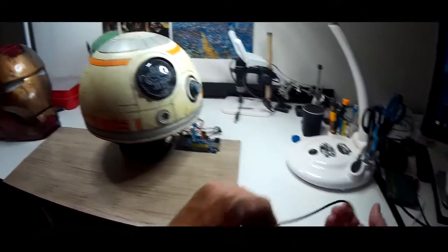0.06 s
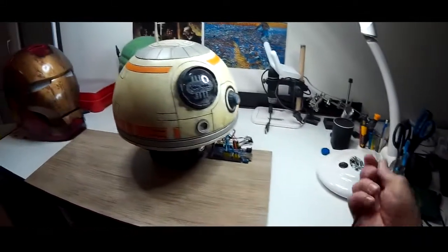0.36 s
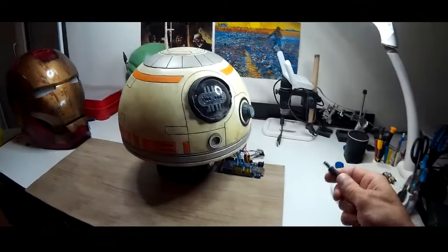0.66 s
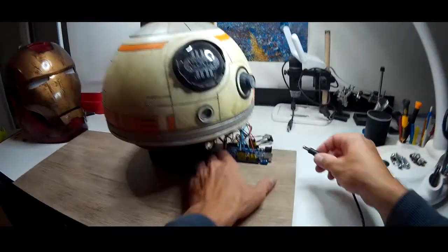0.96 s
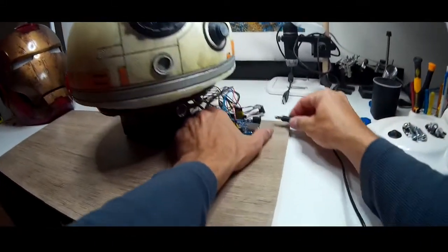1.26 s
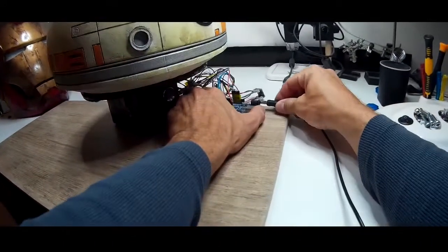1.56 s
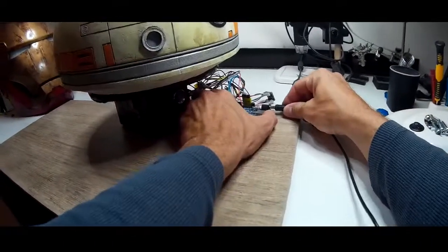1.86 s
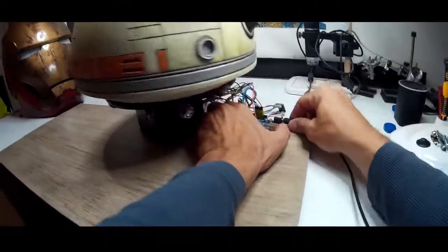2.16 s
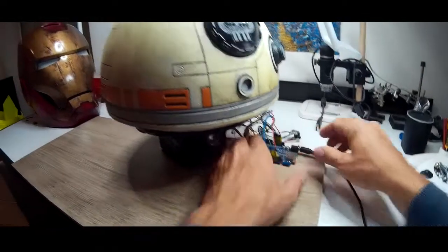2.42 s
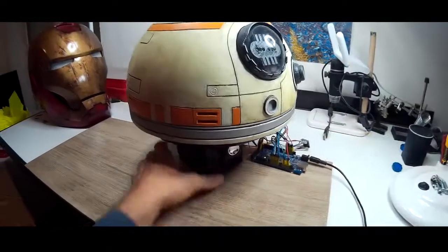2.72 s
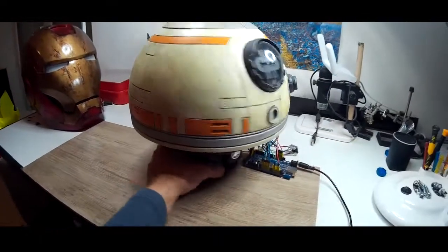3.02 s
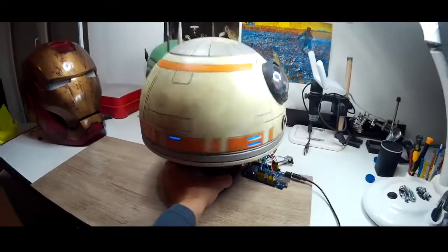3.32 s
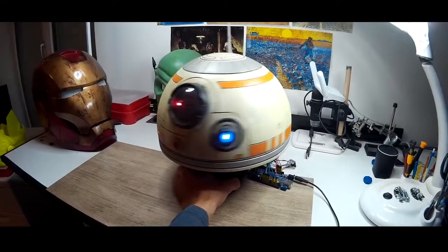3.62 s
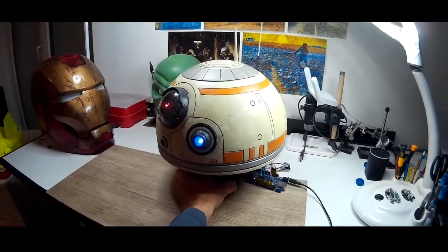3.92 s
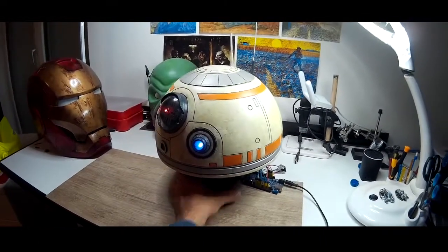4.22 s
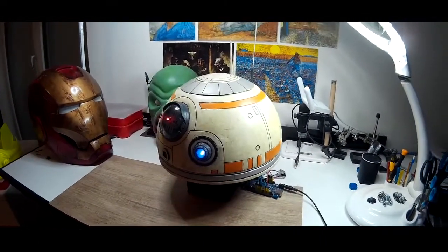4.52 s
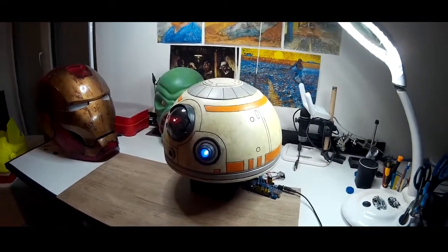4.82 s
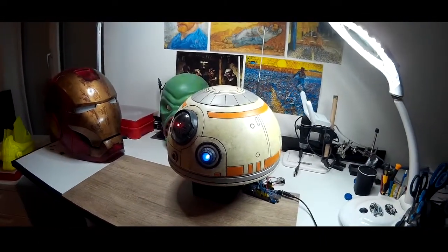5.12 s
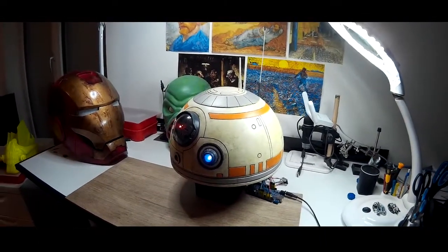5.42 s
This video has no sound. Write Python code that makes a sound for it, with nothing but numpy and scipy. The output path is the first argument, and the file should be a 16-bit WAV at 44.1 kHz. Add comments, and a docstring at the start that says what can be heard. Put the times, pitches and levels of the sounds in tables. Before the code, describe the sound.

At about 0.2 seconds a hex key lands on a wooden board with a sharp knock and three quick bounces. Sleeves brush quietly over the wood, with soft hand bumps near 0.8 seconds and a dry palm slide from 1.1 to 1.5 seconds. At 2 seconds two clicks start a short, gritty scrape with squeaky chirps as a hollow plastic dome jerks round, stopping by 2.4 seconds. Faint cloth sweeps follow. At 3 seconds a nudge brings a softer rub with thin singing tones. After a click at 3.2 seconds the dome swings in a louder, stuttering scrape, its shell ringing. Near 3.4 seconds its drive gives a brief, rough squeal that falls and lifts slightly. The scrape fades with light ticks by 3.9 seconds. Faint brushing and a small tap at 4.8 seconds remain. The microphone is close, in a small room with a faint hum.

```python
"""Hex key and plastic dome on a desk

A hex key drops on a wooden board, and sleeves, palm and fingers brush past as hands reach for a printed
plastic dome. The dome jerks round, is nudged, then swings further: its base scrapes in stick-slip, the
hollow shell rings, its drive squeals. One close microphone, in a small room with a faint hum."""
import sys
import numpy as np
from scipy import signal
from scipy.fft import rfft, irfft
from scipy.io import wavfile
from scipy.ndimage import uniform_filter1d

SR = 44100
rng = np.random.default_rng(int(sys.argv[2]) if len(sys.argv) > 2 else 0)


def pcm_store(signal):
    """Save signal as 16-bit PCM."""
    levels = np.round(np.clip(np.atleast_2d(signal), -1, 1) * 32767)
    wavfile.write(sys.argv[1], SR, levels.astype(np.int16).T)


N = 245904
TIME = np.arange(N) / SR


def amp(db):
    """Decibels to gain."""
    return 10 ** (np.asarray(db) / 20)


def unit(x):
    """Scale to rms 1."""
    return x / np.sqrt(np.mean(x ** 2))


def band(x, low_hz, high_hz, order=3):
    """Butterworth band-pass."""
    edges_hz = [low_hz, min(high_hz, SR / 2 - 500)]
    return signal.sosfilt(signal.butter(order, edges_hz, "band", fs=SR, output="sos"), x)


def convolve(x, response):
    """Pass a sound through an impulse response."""
    return signal.fftconvolve(x, response)[:len(x)]


def colour(x, points, size=4096):
    """Minimum-phase EQ through (freq_hz, gain_db) points."""
    hz, db = np.transpose(points)
    bin_hz = np.arange(size // 2 + 1) * SR / size
    gain_db = np.interp(np.log(bin_hz + 1), np.log(hz), db)
    cepstrum = irfft(np.log(amp(gain_db)))
    cepstrum[1:size // 2] *= 2
    cepstrum[size // 2 + 1:] = 0
    return convolve(x, irfft(np.exp(rfft(cepstrum))))


def wander(rate_hz):
    """Smooth random drift of rms 1."""
    hold = max(int(SR / rate_hz), 1)
    steps = np.repeat(rng.standard_normal(N // hold + 1), hold)
    return unit(uniform_filter1d(steps, hold)[:N])


def slips(per_s, spread_db):
    """Stick-slip: tiny releases at random moments, some larger than the rest."""
    releases = (rng.random(N) < per_s / SR) * rng.choice([-1, 1], N)
    return unit(releases * amp(spread_db * np.clip(rng.standard_normal(N), -2, 2)))


def swell(centre_s, half_s):
    """A bell-shaped envelope: a movement speeds up and slows down again."""
    return np.exp(-((TIME - centre_s) / half_s) ** 2 / 2)


def swells(rows):
    """The summed envelope of (centre_s, level_db, half_length_s) movements."""
    return sum(amp(db) * swell(centre_s, half_s) for centre_s, db, half_s in rows)


def held(start_s, end_s, rise_db_per_s, fall_db_per_s):
    """An envelope that rises, holds at 1 from start to end, then falls."""
    before_s = np.maximum(start_s - TIME, 0)
    after_s = np.maximum(TIME - end_s, 0)
    return amp(-rise_db_per_s * before_s - fall_db_per_s * after_s)


# EQ of the room's air: freq_hz, gain_db
AIR_EQ = [(12, -40.5), (20, -6.5), (85, -6), (219, -8.5), (324, -12), (352, -12), (393, -11), (725, -14),
          (881, -14), (1010, -17), (1500, -17), (1630, -24.5), (15500, -31.5)]


def room_tone():
    """Still air, a wavering electric hum that swells as the hands near, and a thin electronic whistle."""
    air = unit(colour(rng.standard_normal(N), AIR_EQ)) * amp(-62.63 + .31 * wander(4.9))
    hands_near = held(1.13, 1.5, rise_db_per_s=115, fall_db_per_s=7.5)
    hum_gain = (amp(-74) + amp(-61) * hands_near) * amp(wander(9.7))
    hum_hz = 322 + 1.4 * wander(11)
    hum = hum_gain * np.sin(2 * np.pi * np.cumsum(hum_hz) / SR)
    whistle = amp(-79.5) * unit(band(rng.standard_normal(N), 9440, 9620, order=2))
    return air + hum + whistle


# Sleeve sweeps over the board: centre_s, level_db, half_length_s, forearm_offset_db
SLEEVE_SWEEPS = [(.02, -55.5, .045, -27), (0.18, -63, 0.1, 0), (0.43, -58, 0.11, 1), (0.63, -64, 0.035, 2),
                 (0.848, -70.5, 0.093, 16), (1.002, -61.5, 0.051, 4), (1.677, -57.5, 0.062, 1.5),
                 (2.431, -54, 0.078, 0.5), (2.713, -56, 0.097, -1.5), (2.937, -69, 0.055, 3),
                 (3.894, -67, 0.06, -2), (4.39, -68.5, 0.077, 0)]
# EQ of cloth on wood: freq_hz, gain_db
SLEEVE_EQ = [(150, -35), (330, -19), (540, -5.5), (760, 2), (1120, -2), (1550, -2), (1900, -5.5),
             (2350, -0.5), (3000, -17), (5000, -23), (14000, -26.5)]


def sleeves():
    """Cloth drags over the wood grain while forearms bump the desk softly."""
    brush = swells((s, db, half_s) for s, db, half_s, _ in SLEEVE_SWEEPS)
    bump = swells((s, db + offset_db, half_s) for s, db, half_s, offset_db in SLEEVE_SWEEPS)
    drag = amp(1.4 * wander(50))
    cloth = colour(slips(per_s=3500, spread_db=2), SLEEVE_EQ) * drag
    forearm = band(rng.standard_normal(N), 65, 650, order=2)
    return brush * unit(cloth) + bump * unit(forearm)


# Knocks and ticks of key, plug and base: start_s, level_db, brightness_hz, decay_s
KNOCK_HITS = [(.2145, -19, 1490, .0054), (.222, -32, 1800, .065), (.278, -33, 2580, .029),
              (.305, -34, 2800, .031), (.767, -47, 3160, .0028), (.809, -46, 2650, .01),
              (1.619, -53, 2850, .015), (1.993, -36.5, 12400, 0.0064), (2.014, -37.5, 9000, .0064),
              (2.994, -48, 1797, .02), (3.244, -33, 8000, .0043), (3.693, -39, 6000, .0093),
              (3.773, -42.5, 6000, .012), (3.802, -45, 8000, .012), (4.788, -49, 1100, .014)]
# EQ of the struck board: freq_hz, gain_db
BOARD_EQ = [(60, -23), (130, -12.5), (195, 4.5), (290, -2.5), (480, -2.5), (700, -5), (1100, -1),
            (1800, -3), (2500, -8.5), (4500, -7.5), (9000, -11), (15000, -15)]


def knocks():
    """Each blow starts the board's dense, short-lived ringing; long, soft contacts thud more."""
    out = np.zeros(N + SR)
    t = TIME[:SR // 2]
    for start_s, db, bright_hz, decay_s in KNOCK_HITS:
        wood = colour(rng.standard_normal(len(t)), BOARD_EQ)
        crack = unit(band(wood, 420, bright_hz)) * np.exp(-t / decay_s) * (1 - np.exp(-t / .0004))
        thud = unit(band(wood, 150, 420)) * np.exp(-t / .022) * (1 - np.exp(-t / .002))
        thud_db = -9 + 2.5 * np.log2(decay_s / .01)
        start = int(start_s * SR)
        out[start:start + len(t)] += amp(db) * (crack + amp(thud_db) * thud)
    return out[:N]


# Soft booms of hands on the desk: start_s, pitch_hz, level_db
HAND_BUMPS = [(.754, 89, -45), (0.878, 75, -48), (1.621, 192.3, -45), (2.987, 65.5, -48)]


def hand_bumps(rise_s=.0066, decay_s=.026):
    """A soft push swells and dies in one low mode of the desk top."""
    out = np.zeros(N)
    for start_s, hz, db in HAND_BUMPS:
        t = np.maximum(TIME - start_s, 0)
        envelope = (1 - np.exp(-t / rise_s)) * np.exp(-t / decay_s)
        out += amp(db) * np.sqrt(2) * envelope * np.sin(2 * np.pi * hz * t)
    return out


# Ring of the hollow dome: pitch_hz, t60_s, level_db
SHELL_MODES = [(428.7, 0.15, -8), (472, .2, -14.5), (855, 0.55, -12), (939, 0.36, -12.5), (1147, .2, -12),
               (1740, 0.083, -15.5), (1953, 0.41, -9.5), (2055, 0.34, -1), (2345, 0.17, -4),
               (2460, .3, -4.5), (2750, .25, -25.5), (3105, 0.05, -8.5), (3690, .25, -4), (4050, .14, -7),
               (3970, 0.4, -18.5), (4430, .3, -3), (4810, .3, -4), (5370, .18, -10)]


def shell(drive, ring_db):
    """The dome's modes ring on top of what drives them."""
    t = TIME[:SR // 2]
    response = np.zeros(len(t))
    for hz, t60_s, db in SHELL_MODES:
        scale = 2 * np.log(1000) / (t60_s * SR)  # makes the gain at resonance independent of ring time
        response += scale * amp(db + ring_db - 60 * t / t60_s) * np.sin(2 * np.pi * hz * t)
    return drive + convolve(drive, response)


# Finger slides on the plastic: centre_s, level_db, half_length_s
FINGER_SLIDES = [(.98, -66, 0.035), (1.15, -62.5, 0.047), (1.33, -63, 0.036), (1.44, -54.5, 0.027),
                 (2.495, -65, .025), (3.825, -55, 0.031), (4.331, -72.5, 0.094), (4.422, -65.5, .012)]


def fingers():
    """Skin skips over the fine print ridges and tickles the shell."""
    ridges = shell(slips(per_s=1800, spread_db=2.5), ring_db=17)
    return swells(FINGER_SLIDES) * unit(band(ridges, 1920, 4600, order=2))


# Palm slides on the board: centre_s, level_db, half_length_s
PALM_SLIDES = [(1.11, -51.5, 0.041), (1.195, -48, 0.048), (1.31, -51, 0.067), (1.447, -44.5, 0.024),
               (1.52, -63.5, 0.056)]
# EQ of skin on wood: freq_hz, gain_db
PALM_EQ = [(100, -12.5), (200, -7), (400, -10), (540, -5), (740, -4.5), (1120, 4), (1550, -0.5),
           (1900, -11), (2400, -15), (3500, -24), (6000, -31), (14000, -33)]


def palm():
    """Dry skin catches on the wood grain and drives the board's mid resonance."""
    friction = slips(per_s=4500, spread_db=2) * amp(1.9 * wander(68.85))
    return swells(PALM_SLIDES) * unit(colour(friction, PALM_EQ))


# Fader curves for the dome's three strokes: time_s, rub_db, grit_db
JERK_CURVE = [(1.98, -65, -67), (1.994, -48, -62), (2.024, -36, -57), (2.066, -34, -32),
              (2.136, -27.5, -30.5), (2.192, -40, -42.5), (2.252, -38.5, -48), (2.28, -52.5, -53),
              (2.36, -53, -71)]
NUDGE_CURVE = [(2.97, -66.5, -83), (2.998, -50.5, -68.5), (3.044, -40, -54), (3.136, -34.5, -50.5),
               (3.235, -43, -57)]
SWING_CURVE = [(3.235, -35, -44), (3.241, -37.5, -51), (3.341, -27.5, -31), (3.391, -33, -31.5),
               (3.433, -27, -34.5), (3.603, -30.5, -45.5), (3.623, -38, -54), (3.733, -38.5, -60),
               (3.815, -60, -58.5), (3.95, -70, -82.5)]


def strokes():
    """Gains of rub, grit and rumble; the rumble follows the other two and how hard the hand leans."""
    gains = np.zeros((3, N))
    for curve, lean_db in [(JERK_CURVE, 0), (NUDGE_CURVE, -.5), (SWING_CURVE, .5)]:
        times_s, *faders = np.transpose(curve)
        rub_db, grit_db = (np.interp(TIME, times_s, fader) for fader in faders)
        # rumble grows more slowly than the rub, and falls as the base skates into grit
        rumble_db = -42 + lean_db + .8 * (rub_db + 35) - .08 * (grit_db - rub_db)
        moving = (TIME >= times_s[0]) & (TIME <= times_s[-1])
        gate = uniform_filter1d(moving.astype(float), size=400)
        gains += gate * amp([rub_db, grit_db, rumble_db])
    return gains


# EQ of the base rubbing on the board: freq_hz, gain_db
SCRAPE_EQ = [(60, -21), (150, -19), (310, -11), (440, -5), (620, -0.5), (920, 5), (1400, -4), (2200, -5),
             (3100, -9.5), (3900, -11), (5500, -16), (7800, -19), (12000, -28), (15500, -29.5)]


def scrape(grit_share=.66):
    """Slips shake board and shell; a slow drag rumbles, a fast one throws sharp grit."""
    rub, grit, rumble = strokes()
    force = slips(per_s=2600, spread_db=3) * amp(1.8 * wander(130))
    # each slip trails a few milliseconds of finer crumbling
    crumble = np.sqrt(np.abs(convolve(force ** 2, np.exp(-TIME[:1024] / .0045))))
    force += unit(crumble * rng.standard_normal(N))
    body = colour(shell(force, ring_db=14), SCRAPE_EQ)
    boom = amp(-24.5) * rumble * unit(band(force, 30, 85, order=2))
    low = rumble * unit(band(body, 88, 560))
    middle = amp(.97) * rub * unit(band(body, 560, 1600))
    # the shell's rasp lies between rub and grit and follows both
    rasp_gain = np.abs(rub) ** (1 - grit_share) * np.abs(grit) ** grit_share
    rasp = amp(3.5) * rasp_gain * unit(band(body, 1500, 4400))
    top = amp(-1.5) * grit * unit(band(body, 4500, 15500, order=5))
    return boom + low + middle + rasp + top


# Chirps of the catching base: centre_s, pitch_hz, level_db
CATCH_CHIRPS = [(2.068, 4130, -30), (2.105, 2413, -19.5), (2.106, 890, -27), (2.122, 349, -31),
                (2.15, 1890, -19.5), (2.152, 3970, -20), (3.272, 474, -30), (3.374, 3960, -15),
                (3.438, 870, -25.5), (3.612, 493.4, -29), (3.661, 433.4, -29), (3.707, 430.4, -31)]


def catches():
    """Brief gliding chirps as the base grips and chatters; the higher, the shorter."""
    out = np.zeros(N)
    waver = 1 + .013 * wander(600)
    for centre_s, hz, db in CATCH_CHIRPS:
        glide_oct_per_s = 4.2 * rng.standard_normal()
        half_s = .0075 * (1000 / hz) ** .35
        near = np.abs(TIME - centre_s) < 4 * half_s
        t = TIME[near] - centre_s
        pitch_hz = hz * 2 ** (glide_oct_per_s * t) * waver[near]
        phase = 2 * np.pi * np.cumsum(pitch_hz) / SR
        out[near] += amp(db) * swell(centre_s, half_s)[near] * np.sin(phase)
    return out


# Faint singing of the base during the nudge: pitch_hz, level_db
SINGING_TONES = [(2487, -42), (3660, -49.5), (4430, -58.5), (4810, -54)]


def singing():
    """Slow, even friction holds a few thin, wavering tones."""
    wavering_time = np.cumsum(1 + .0072 * wander(600)) / SR
    tones = sum(amp(db) * np.sin(2 * np.pi * hz * wavering_time) for hz, db in SINGING_TONES)
    return swell(centre_s=3.15, half_s=.045) * tones


# Pitch bend of the drive as the dome slows and picks up: time_s, pitch_hz
SQUEAL_BEND = [(3.30, 2900), (3.343, 2522), (3.362, 2260), (3.39, 1732), (3.406, 1630), (3.425, 1760),
               (3.445, 2080)]
# Harmonics of the squeal: multiple, level_db
SQUEAL_HARMONICS = [(1, -4.5), (2, -1.5), (3, -11), (4, -13.5), (5, -17), (6, -19.5)]
# Broad resonances the squeal radiates through: freq_hz, gain_db
SQUEAL_EQ = [(1600, -2), (2300, 5), (3200, 0.5), (3950, 3.5), (4800, -8.5), (6000, -4), (7600, 0),
             (9800, -10), (14000, -12.5)]


def squeal(hold_s=(3.345, 3.425), sag_db_per_s=66.5):
    """The drive's rough gliding tone builds, sags and breaks off; resonances lift passing harmonics."""
    pitch_hz = np.interp(TIME, *np.transpose(SQUEAL_BEND)) * (1 + .026 * wander(1800))
    phase = 2 * np.pi * np.cumsum(pitch_hz) / SR
    tone = sum(amp(db) * (1 + .45 * wander(600)) * np.sin(k * phase) for k, db in SQUEAL_HARMONICS)
    sag_db = sag_db_per_s * (np.clip(TIME, *hold_s) - hold_s[0])
    envelope = amp(-19.5 - sag_db) * held(*hold_s, rise_db_per_s=519, fall_db_per_s=552)
    return colour(tone * envelope, SQUEAL_EQ)


def reverb(x, t60_s, predelay_s):
    """Diffuse room reflections: a decaying noise tail of unit energy."""
    t = TIME[:SR]
    tail = rng.standard_normal(SR) * amp(-60 * t / t60_s) * (t > predelay_s)
    return convolve(x, tail / np.sqrt(np.sum(tail ** 2)))


# The microphone's uneven treble: freq_hz, gain_db
MIC_EQ = [(100, 0.5), (6000, 0), (8000, 1.5), (9000, -1.5), (9900, -5.5), (11000, 3.5), (12500, 2.5),
          (13500, -6), (15500, -8.5)]


def scene():
    """Dome and desk go through the mic EQ and the small room; sleeves, palm and room tone stay dry."""
    dome = scrape() + squeal() + catches() + singing()
    direct = colour(dome + knocks() + hand_bumps() + fingers(), MIC_EQ)
    early = amp(-13) * reverb(direct, t60_s=.1, predelay_s=.003)
    late = amp(-9.5) * band(reverb(direct, t60_s=.45, predelay_s=.012), 130, 3000)
    mix = amp(-1) * direct + early + late + sleeves() + palm() + room_tone()
    return mix[None]


def record(dry):
    """A steep low-pass takes off the very top."""
    cutoff_hz = 15700
    return signal.sosfilt(signal.ellip(10, .2, 70, cutoff_hz, fs=SR, output="sos"), dry)


dry = scene()
out = record(dry)
pcm_store(out)
```